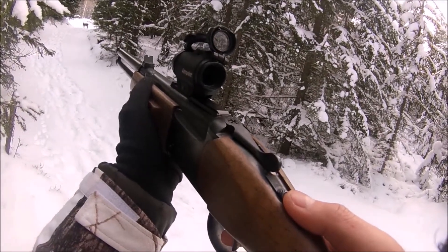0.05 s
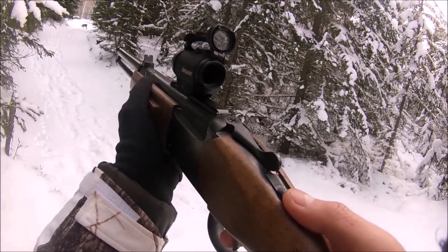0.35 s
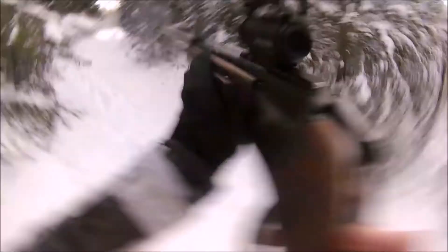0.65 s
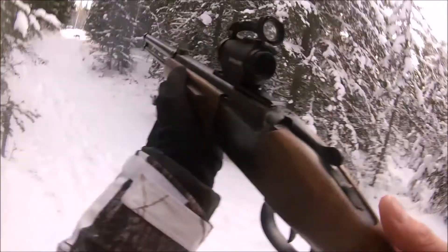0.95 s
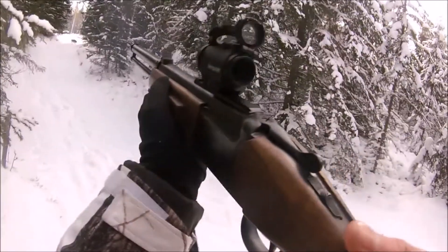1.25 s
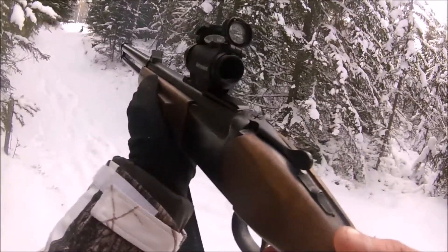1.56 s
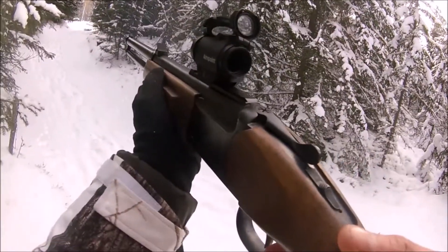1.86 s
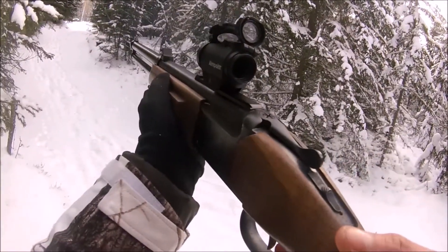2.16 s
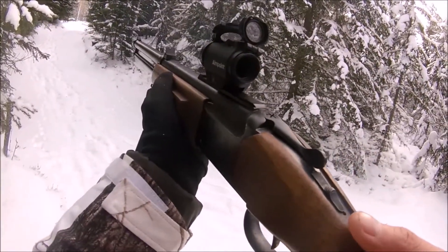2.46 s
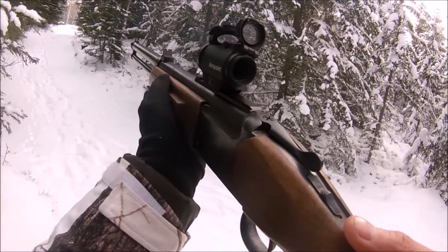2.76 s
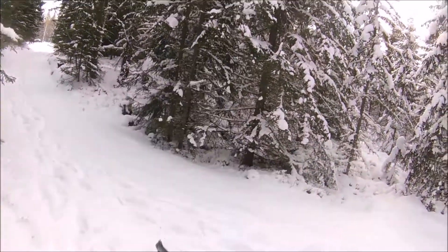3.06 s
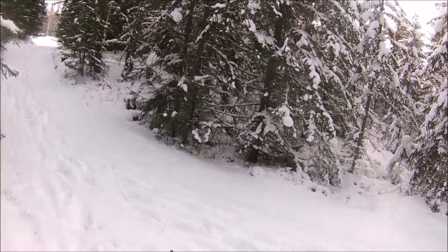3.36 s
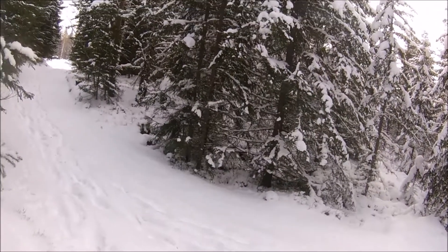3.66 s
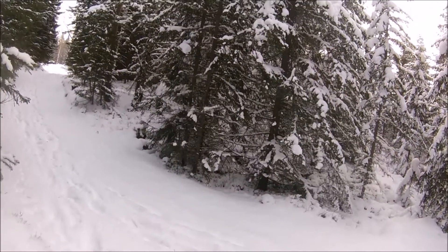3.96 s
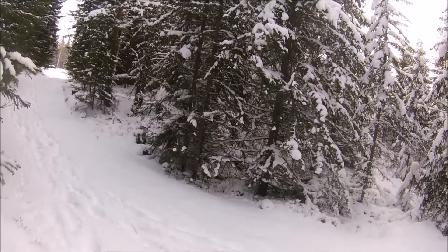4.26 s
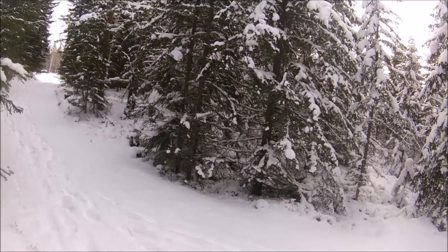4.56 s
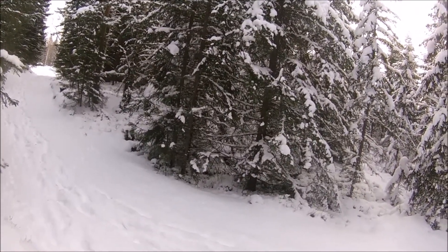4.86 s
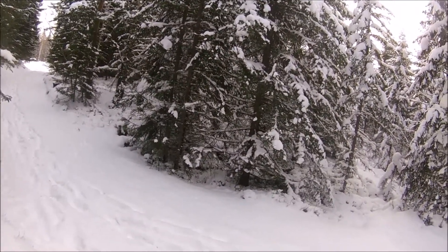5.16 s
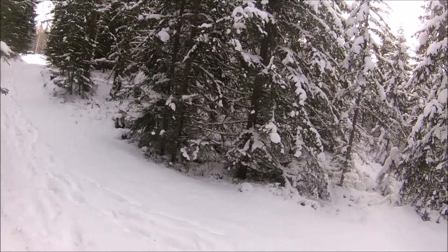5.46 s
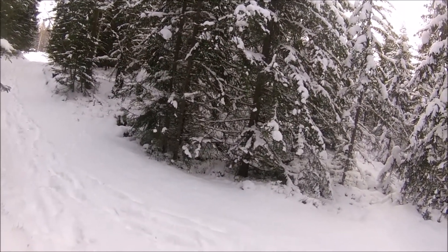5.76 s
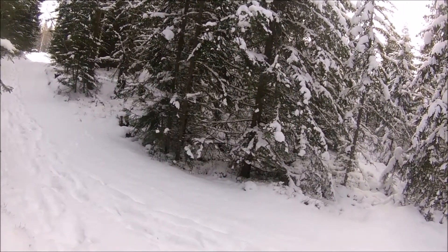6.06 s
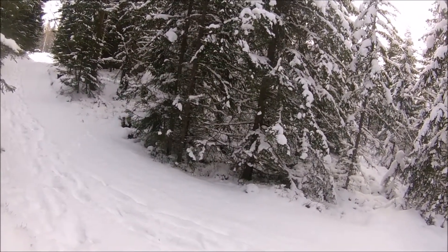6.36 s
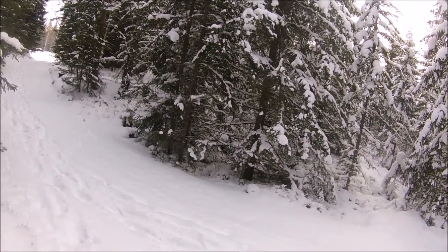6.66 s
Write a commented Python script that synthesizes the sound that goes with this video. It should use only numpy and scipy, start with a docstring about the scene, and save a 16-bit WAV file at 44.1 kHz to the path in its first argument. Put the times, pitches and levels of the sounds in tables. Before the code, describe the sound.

After a brief upward whistle, a close rifle shot cracks and rumbles away among the trees, leaving quiet, steady wind.

```python
"""A rifle shot in a snowy forest

A short whistle rises in still air and a sleeve brushes a rifle. One shot goes off beside a small
camera in a closed case and overloads its microphone. Branches sizzle, and trunks and hillsides send
the blast back as thuds and a long, dull roll. The sound cuts out for a moment, then returns as
steady wind in the firs, with a few more brushes of cloth and a faint, far drone at the end."""
import sys
import numpy as np
from scipy import signal
from scipy.fft import rfft, irfft
from scipy.io import wavfile
from scipy.ndimage import uniform_filter1d

SR = 44100
rng = np.random.default_rng(int(sys.argv[2]) if len(sys.argv) > 2 else 0)


def to_wav(s):
    """Save 16-bit WAV."""
    ch = np.atleast_2d(s).T  # columns
    pcm = np.round(np.clip(ch, -1, 1) * 32767)  # PCM
    wavfile.write(sys.argv[1], SR, pcm.astype(np.int16))


N = 296660
T = np.arange(N) / SR

# Little catches in the whistle. Each row: time in seconds, dip in dB, width in seconds, bend in Hz.
WHISTLE_CATCHES = [(0.029, -9, 0.0084, 8), (0.174, -6, 0.004, 12), (0.203, -8, 0.005, 12)]
# Soft sounds: two low swells of the air near the start, cloth on the rifle at the shot, a small clink at 1.068
# s and later rustles. Each row: time in seconds, level in dB, middle pitch in Hz, range in octaves, # width in
# seconds.
SOFT_SOUNDS = [(0.065, -46.5, 231, 1.44, 0.037), (0.25, -46.5, 258, 1.5, 0.038),
               (0.625, -45, 370, 2.76, 0.034), (1.068, -61, 3030, 0.38, 0.0062),
               (3.035, -48, 620, 0.89, 0.014), (3.114, -56, 1860, .4, 0.006),
               (3.123, -43, 400, 1.48, 0.018), (3.176, -50.5, 1850, 0.66, 0.006)]
# The blast and its first bounces off snow, body and trees. Each row: time in seconds, level in dB,
# rounding in seconds, the rear shock's level against the front in dB, its delay in seconds.
SHOCK_WAVES = [(.6457, 0, .00003, -1, .0017), (.6494, 0, 0.000043, -28, .0017),
               (.6541, -1.5, .00001, -30.5, 0.0018), (.6567, -2, 0.000054, -0.5, 0.00093),
               (.6592, -1.5, 0.00024, -10.5, 0.0021)]
# Echoes from tree lines and slopes. Each row: time in seconds, level in dB, share of crack in dB,
# share of deep thud in dB, spread of the crack in seconds.
TREE_ECHOES = [(.718, -21.5, -10.5, -6, .005), (.733, -18, -30, -19, .004), (.761, -20, -17, -5, .0015),
               (.774, -17.5, -24, -6.5, 0.0032), (.786, -15.5, -18.5, 4.5, 0.0073),
               (.833, -26, -5, -10, .0015), (.839, -11.5, -8, -14, 0.001), (0.852, -14, -22, -3, .005),
               (.895, -19, -24, -14, .004), (.962, -17, -17, -10, .007), (.987, -12.5, -19, -9, 0.0068),
               (1.027, -18.5, -24, -14, .004), (1.064, -17.5, -12, -14.5, .007),
               (1.088, -14, -22, -13, .004), (1.138, -16.5, -24, -14, .004),
               (1.158, -13.5, -28.5, -15, .004), (1.241, -16, -23.5, -17, .004),
               (1.258, -10, -21, -18, 0.003), (1.315, -16, -20, -15, .012), (1.357, -10, -27, -16, .004),
               (1.434, -18.5, -26, -12.5, .005), (1.595, -19.5, -28, -11, .005),
               (1.69, -20.5, -29, -4, .006), (1.736, -20, -28, -18, .005), (1.787, -21.5, -28, -8, 0.0053),
               (1.868, -19.5, -29, -14, .005), (2.138, -24.5, -28, -14, .006), (2.527, -26, -29, -5, .006),
               (2.565, -26, -28, -11.5, .006)]
# How the drone swells. Each row: time in seconds, level in dB.
DRONE_LEVELS = [(5.4, -85), (5.95, -61.5), (6.73, -59.5)]

# Tone colours say how strong the lows and highs are. Each row: frequency in Hz, relative level in dB.
AIR_COLOUR = [(20, -10), (90, -1), (160, 4.5), (260, 2.5), (450, -7), (700, -9.5), (1100, -14.5),
              (2000, -24.5), (3500, -36.5), (6500, -48.5), (8000, -63), (15000, -65.5)]  # still forest air
GAS_COLOUR = [(200, -1), (900, 5), (1500, -3), (2300, 4), (2900, -1), (3500, -6), (4300, -21), (7800, -23),
              (9500, -51.5)]  # muzzle gas heard through the case
BLAST_COLOUR = [(20, 1.5), (110, 0.5), (220, -1), (380, -4), (560, -10), (850, -14), (1400, -24.5),
                (2500, -39), (4500, -47.5), (8000, -59.5), (14000, -74)]  # one shock heard through the case
SIZZLE_COLOUR = [(400, 0), (900, 7), (1300, 4), (2400, 0.5), (3500, -8), (5000, -17), (7000, -23.5),
                 (9000, -31.5), (14000, -51)]  # snow and twigs on the nearest branches
BOOM_COLOUR = [(20, -23.5), (60, -20.5), (95, -15), (160, -2), (260, 2.5), (350, 2.5), (460, -5),
               (560, -13.5), (720, -33), (1100, -61), (3000, -76.5), (12000, -110)]  # the boom from near trees
THUD_COLOUR = [(30, -23.5), (80, -16), (160, 3), (260, -14), (600, -43), (4000, -100), (14000, -130)]  # the deep part of an echo
CRACK_COLOUR = [(300, -5.5), (800, 8), (1100, 7), (1400, 0), (2300, -8), (2800, -20), (4200, -36),
                (5400, -66.5), (12000, -82)]  # the sharp part of an echo
SCATTER_COLOUR = [(100, -29), (400, -11), (690, -4.5), (850, 6), (960, 0), (1100, 2), (1450, -15),
                  (2000, -17.5), (3000, -28), (4200, -51), (7000, -67), (14000, -93.5)]  # the bright part of the roll
FAR_BOOM_COLOUR = [(20, -19), (60, -24), (95, -18.5), (150, -3.5), (220, -2.5), (300, 2.5), (380, -7.5),
                   (470, -14.5), (600, -30), (1100, -48), (3000, -74), (12000, -110)]  # the roll from far slopes
WIND_COLOUR = [(20, -8), (110, -8.5), (160, -5.5), (210, 1), (310, 0), (420, 0), (620, -2.5), (850, -8),
               (1600, -13), (3500, -23.5), (5000, -31), (8000, -40), (13000, -49.5), (15000, -66)]  # wind in the fir tops

SHOT_S = SHOCK_WAVES[0][0]
SILENCE_START_S, SILENCE_END_S = 2.879, 2.982


def undb(db):
    """Turn decibels into a number to multiply by."""
    return 10 ** (np.asarray(db) / 20)


def unit(x):
    """Scale a sound to a standard strength (rms 1)."""
    return x / np.std(x)


def noise():
    """White noise, an even hiss."""
    return rng.standard_normal(N)


def colour(x, points, size=4096):
    """Filter a sound so that it takes on a tone colour."""
    hz, db = np.transpose(points)
    bins = np.maximum(np.fft.rfftfreq(size, 1 / SR), 1)
    gains = undb(np.interp(np.log(bins), np.log(hz), db))
    # fold the filter so that it rings only after it is struck
    cepstrum = irfft(np.log(gains))
    cepstrum[1:size // 2] *= 2
    cepstrum[size // 2 + 1:] = 0
    ring = irfft(np.exp(rfft(cepstrum))) * np.hanning(2 * size)[size:]
    return signal.fftconvolve(x, ring / np.abs(ring).max())[:N]


def noise_band(hz, octaves):
    """Noise in a range of pitches around hz."""
    edges = np.minimum(hz * 2 ** (np.array([-.5, .5]) * octaves), SR / 2 - 1)
    return unit(signal.sosfilt(signal.butter(3, edges, "band", fs=SR, output="sos"), noise()))


def wander(per_s):
    """A smooth random wobble that picks per_s new values a second."""
    step = int(SR / per_s)
    stairs = np.repeat(noise()[:N // step + 1], step)[:N]
    return unit(uniform_filter1d(uniform_filter1d(stairs, step), step))


def swell(at_s, width_s):
    """A bell-shaped rise and fall around one moment."""
    return np.exp(-.5 * ((T - at_s) / width_s) ** 2)


def envelope(age, attack_s, hold_s, rise_db_per_s, fall_db_per_s, sag_db_per_s=0):
    """Loudness that rises to 1, holds or sags, then dies away."""
    past = age - attack_s
    rise_db = rise_db_per_s * np.minimum(past, 0)
    sag_db = sag_db_per_s * np.maximum(past, 0)
    fall_db = fall_db_per_s * np.maximum(past - hold_s, 0)
    return undb(rise_db - sag_db - fall_db)


def clicks(times, sizes):
    """One sharp click at each time."""
    return np.bincount((np.asarray(times) * SR).astype(int), sizes, N)[:N]


def spread_click(at_s, spread_s):
    """A click scattered over a short time, with the same total energy."""
    x = noise() * swell(at_s, spread_s)
    return x / np.linalg.norm(x)


def trunks(per_s):
    """Many tiny bounces off trunks, random in time and size."""
    return unit(noise() * (rng.random(N) < per_s / SR))


def still_air(level_db=-47, lull_db=-0.5, sink_db=-8.5):
    """A soft hiss that dips slightly after the whistle and sinks for a while after the shot."""
    corners_s = SHOT_S + np.cumsum([0, 0.09, 0.45, .22])  # sink, stay down, come back
    sunk = np.interp(T, corners_s, [0, 1, 1, 0])
    db = level_db + lull_db * swell(.42, 0.07) + sink_db * sunk
    return unit(colour(noise(), AIR_COLOUR)) * undb(db)


def whistle(start_hz=936, glide_hz=568, glide_s=.36, level_db=-22, trees_db=-24):
    """A pure tone glides up, catches three times and fades; the trees smear it faintly."""
    bends_hz = sum(bend * swell(s, width) for s, _, width, bend in WHISTLE_CATCHES)
    dips_db = sum(dip * swell(s, width) for s, dip, width, _ in WHISTLE_CATCHES)
    db = level_db + 0.5 * wander(150) + dips_db
    hz = start_hz + glide_hz * (1 - np.exp(-T / glide_s)) + bends_hz
    hz *= 1 + 0.0043 * wander(120)
    effort = envelope(T, attack_s=0.066, hold_s=0.12,
                      rise_db_per_s=61.5, fall_db_per_s=295, sag_db_per_s=39.5)
    tone = np.sqrt(2) * effort * undb(db) * np.sin(2 * np.pi * np.cumsum(hz) / SR)
    trees = trunks(510) * np.exp(-T / 0.11)
    return tone + undb(trees_db) * signal.fftconvolve(tone, trees / np.linalg.norm(trees))[:N]


def soft_sounds():
    """Two low swells of the air, cloth brushing the rifle as it kicks back and later rustles, and a small
    clink."""
    return sum(noise_band(hz, octaves) * undb(db) * swell(s, width)
               for s, db, hz, octaves, width in SOFT_SOUNDS)


def shock(at_s, rounding_s):
    """One jolt of air pressure; the rounder it is, the duller it sounds."""
    pulse = swell(at_s, rounding_s)
    return pulse / pulse.sum()


def rifle_shot(blast_db=-0.8, gas_db=-25.5, push_db=-7, pin_db=-28, ceiling=0.8, leak_db=-30):
    """The firing pin strikes, gas spits, and the blast slams the case and overloads the microphone."""
    shocks = sum(undb(db) * (shock(s, rounding) - undb(rear_db) * shock(s + delay, rounding))
                 for s, db, rounding, rear_db, delay in SHOCK_WAVES)
    blast = -undb(blast_db) * colour(shocks, BLAST_COLOUR)
    pin = undb(pin_db) * noise_band(hz=480, octaves=2) * swell(.6396, 0.0016)
    spits = swell(.6436, 0.0009) + 0.5 * swell(.6576, 0.00067)
    gas = undb(gas_db) * unit(colour(noise(), GAS_COLOUR)) * spits
    push = undb(push_db) * swell(.6446, 0.00067)  # air leaves the barrel just ahead of the shock
    overloaded = ceiling * np.tanh((blast + gas + push + pin) / ceiling)
    case = signal.ellip(8, .3, 60, 8900, fs=SR, output="sos")  # little above 8900 Hz gets in
    return signal.sosfilt(case, overloaded) + undb(leak_db) * overloaded


def branch_sizzle(level_db=-46, rise_s=0.0044, decay_s=0.0059, tail_db=-9, tail_s=0.034):
    """Snow and twigs close by throw back a bright spray that drops fast and leaves a thin tail."""
    age = T - SHOCK_WAVES[2][0]
    past = np.maximum(age, 0)
    rise = np.exp(np.minimum(age, 0) / rise_s)
    fade = np.exp(-past / decay_s) + undb(tail_db) * np.exp(-past / tail_s)
    return undb(level_db) * unit(colour(noise(), SIZZLE_COLOUR)) * rise * fade


def tree_rumble(points):
    """Dense bounces of one tone colour, kept even: each belt of trees returns the same share."""
    x = colour(trunks(4000), points)
    return x / np.sqrt(uniform_filter1d(x ** 2, size=2600))


def forest_roll(branch_db=-25.5, near_db=-23.6, bright_db=-44.5, far_db=-34.5, flutter_db=1.2):
    """The forest scatters the blast: branches answer first, near trees swell, far slopes linger."""
    age = np.maximum(T - SHOT_S, 0)
    branches = undb(branch_db) * tree_rumble(BOOM_COLOUR)
    branches *= np.exp(-age / 0.023) * np.tanh(age / 0.0045) ** 2
    near = undb(near_db) * tree_rumble(BOOM_COLOUR)
    near *= envelope(age, attack_s=0.34, hold_s=0.29, rise_db_per_s=21.5, fall_db_per_s=22.5)
    bright = undb(bright_db) * tree_rumble(SCATTER_COLOUR)
    bright *= envelope(age, attack_s=0.43, hold_s=.15, rise_db_per_s=12.5, fall_db_per_s=23)
    far = undb(far_db) * tree_rumble(FAR_BOOM_COLOUR)
    far *= envelope(age, attack_s=0.91, hold_s=.35, rise_db_per_s=14.5, fall_db_per_s=3.5)
    # sound needs 0.059 seconds to reach the edge of the clearing and come back
    returned = .5 + .5 * np.tanh((age - 0.059) / .006)
    return (branches + returned * (near + bright + far)) * undb(flutter_db * wander(30.1))


def echoes(smear=0.025, smear_s=0.0092, thud_db=-3.5):
    """Tree lines return the shot as separate thuds; the nearest keep some crack."""
    times, db, crack_db, deep_db, spreads = np.transpose(TREE_ECHOES)
    booms = colour(clicks(times, undb(db)), BOOM_COLOUR)
    thuds = colour(clicks(times, undb(db + deep_db + thud_db)), THUD_COLOUR)
    cracks = sum(size * spread_click(s, spread)
                 for s, size, spread in zip(times, undb(db + crack_db), spreads))
    depth = smear * noise() * np.exp(-T / smear_s)  # a stand of trees is some metres deep
    depth[0] = 1
    return signal.fftconvolve(booms + thuds, depth)[:N] + colour(cracks, CRACK_COLOUR)


def wind(level_db=-48, sway_db=0.2, gust_db=2, swirl_db=-13, easing_db_per_s=0.15):
    """A smooth rush in the fir tops slowly eases; swirls around nearer branches come and go."""
    rush = unit(colour(noise(), WIND_COLOUR)) * undb(sway_db * wander(3.9))
    swirls = sum(noise_band(hz, octaves=0.76) * undb(gust_db * wander(5.4)) for hz in (250, 400, 620))
    db = level_db - easing_db_per_s * (T - SILENCE_END_S)
    return (rush + undb(swirl_db) * unit(swirls)) * undb(db)


def far_drone(pitch_hz=160, waver=0.0118, throb_db=1.5):
    """One low, unsteady tone, perhaps an engine far down the valley."""
    db = np.interp(T, *np.transpose(DRONE_LEVELS)) + throb_db * wander(11)
    hz = pitch_hz * (1 + waver * wander(14))
    return np.sqrt(2) * undb(db) * np.sin(2 * np.pi * np.cumsum(hz) / SR)


def scene():
    """Whistle, shot and roll; a short silence; then the wind."""
    before = whistle() + rifle_shot() + branch_sizzle() + echoes() + forest_roll() + still_air()
    after = wind() + far_drone()
    return (before * (T < SILENCE_START_S) + after * (T > SILENCE_END_S) + soft_sounds())[None]


def record(dry):
    """The camera loses the highest treble, above 14900 Hz."""
    return signal.sosfilt(signal.ellip(8, .2, 70, 14900, fs=SR, output="sos"), dry)


dry = scene()
out = record(dry)
to_wav(out)
```